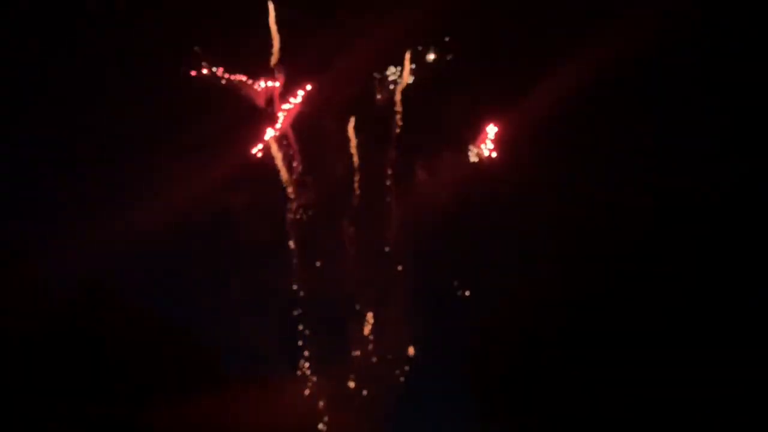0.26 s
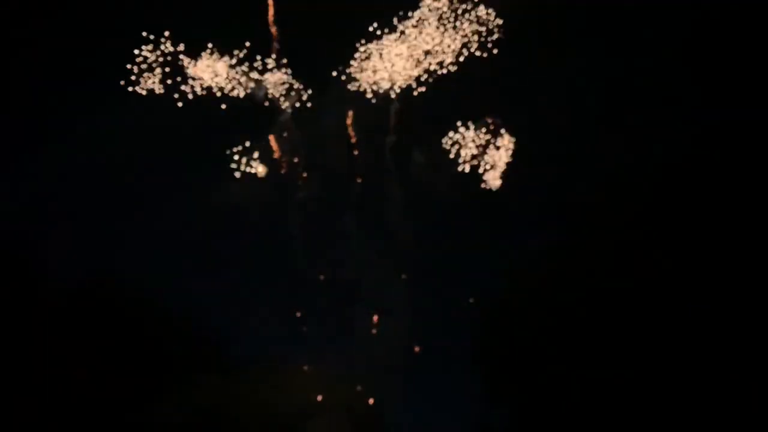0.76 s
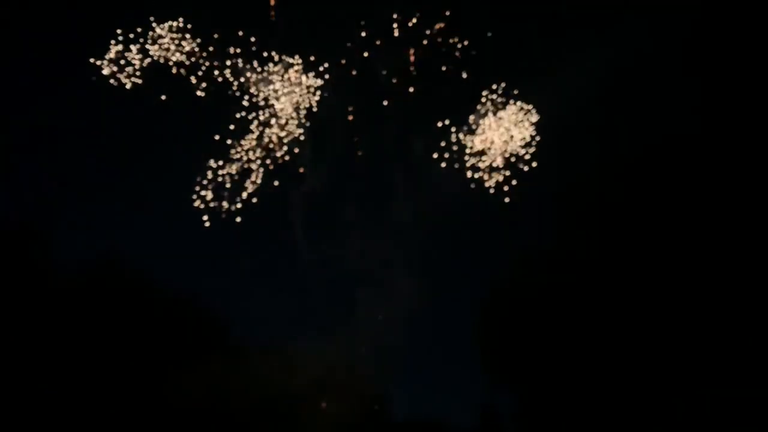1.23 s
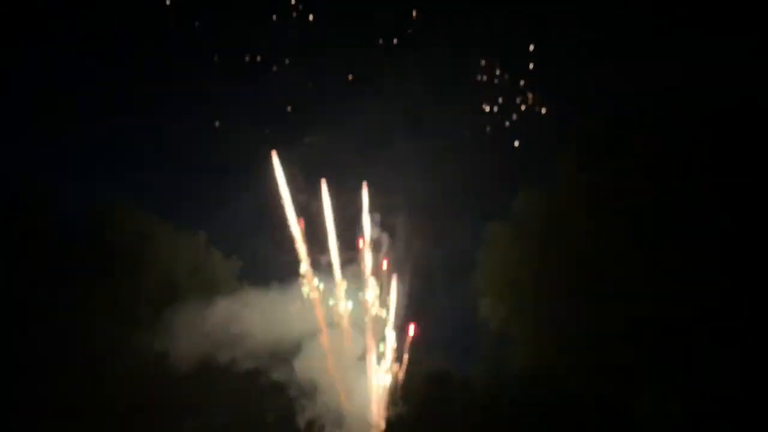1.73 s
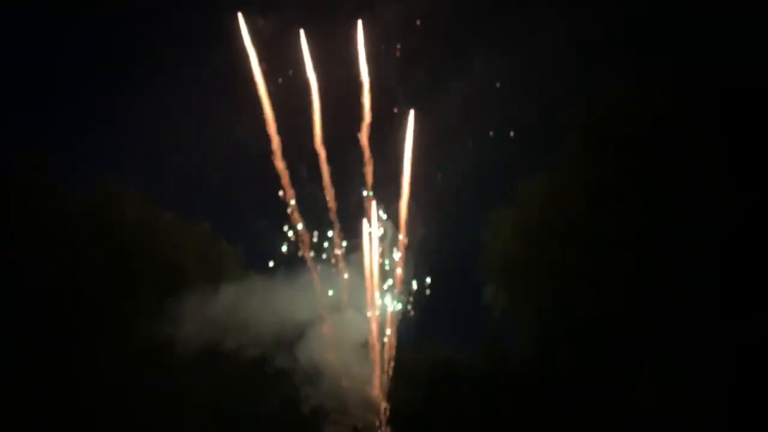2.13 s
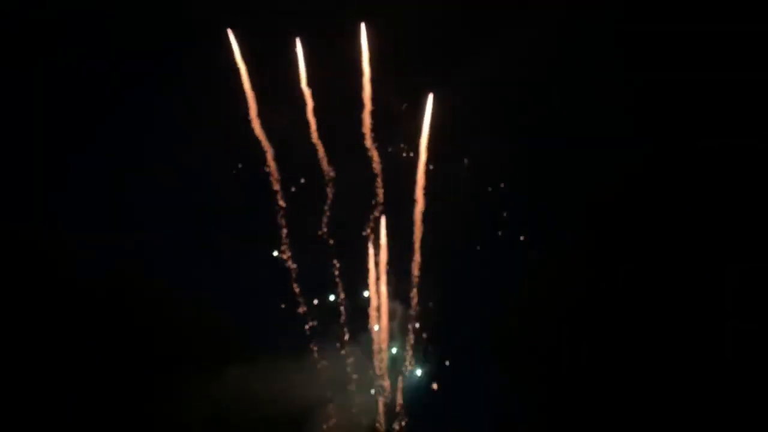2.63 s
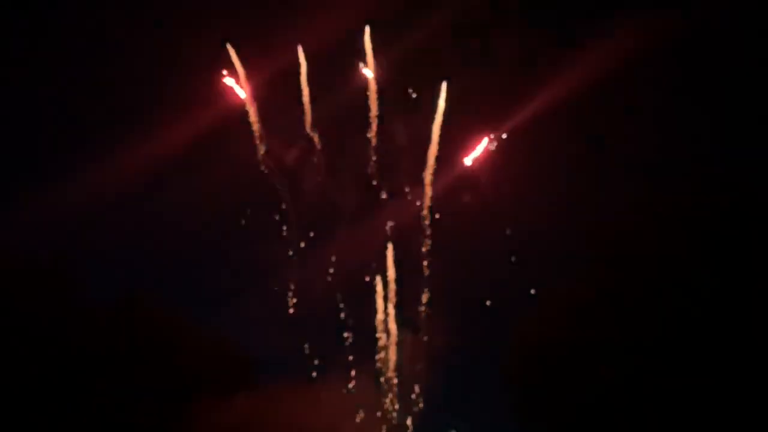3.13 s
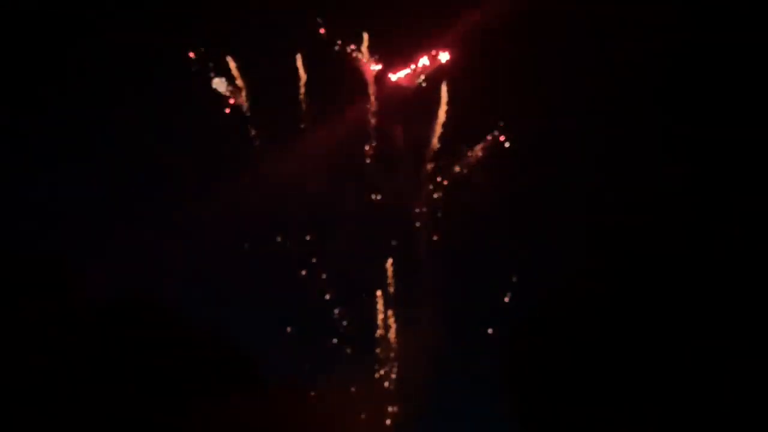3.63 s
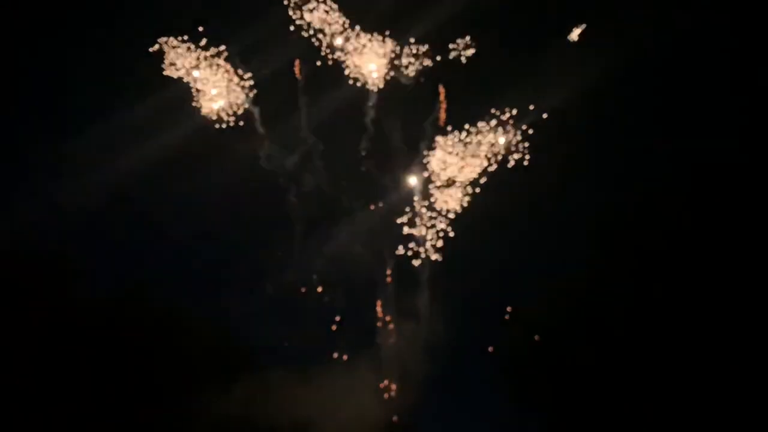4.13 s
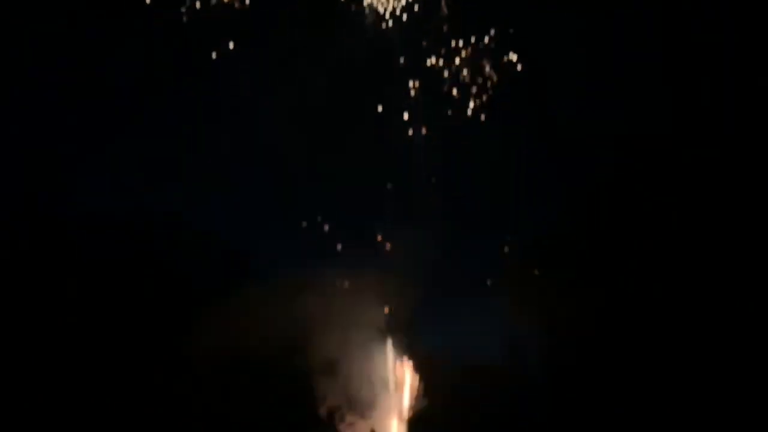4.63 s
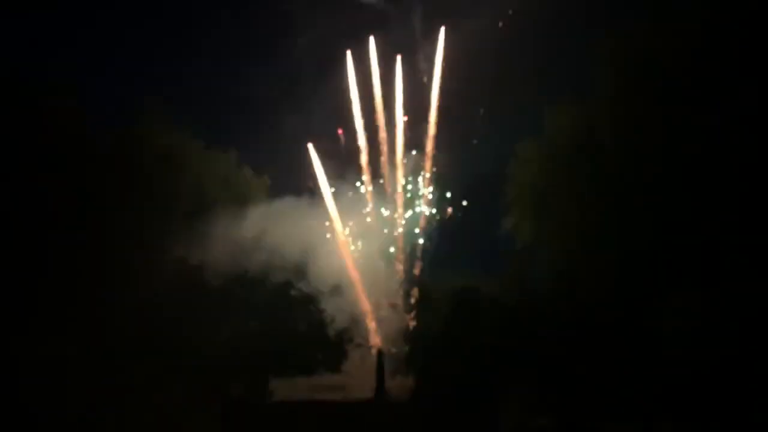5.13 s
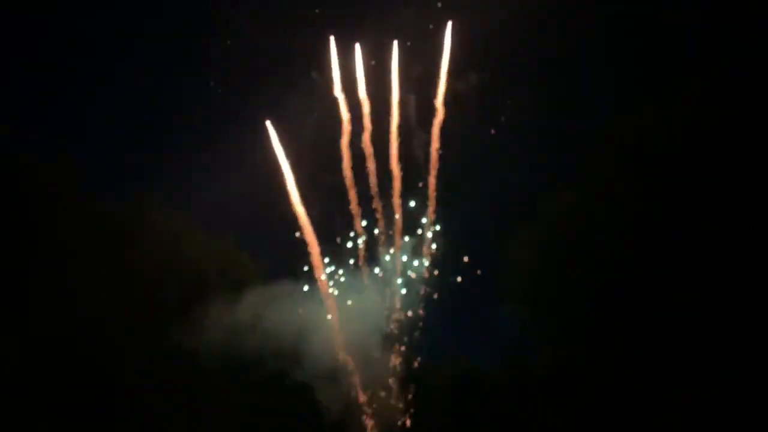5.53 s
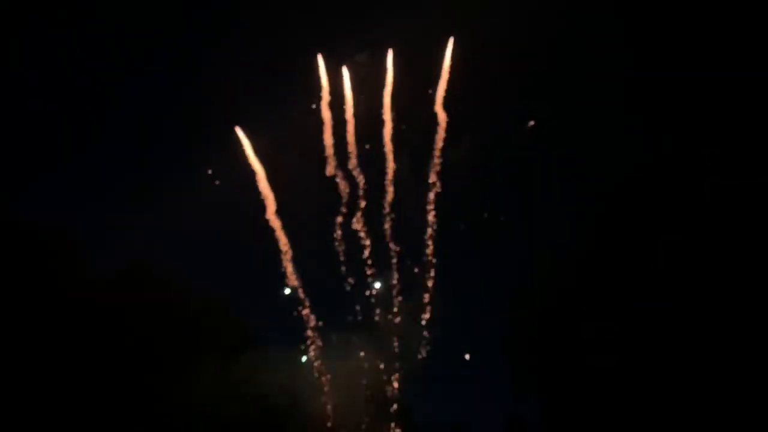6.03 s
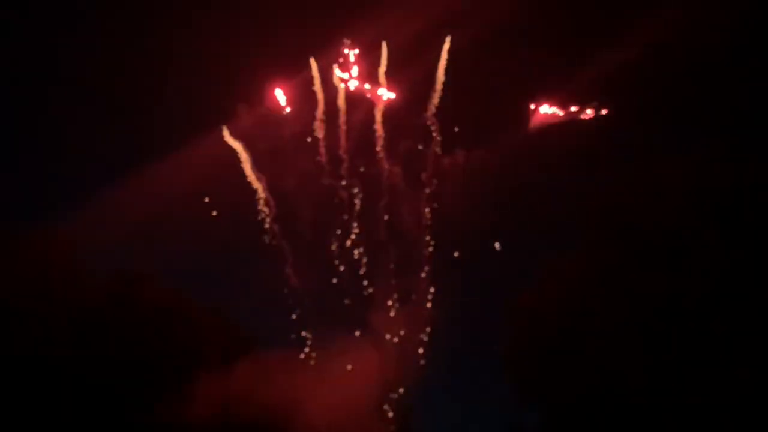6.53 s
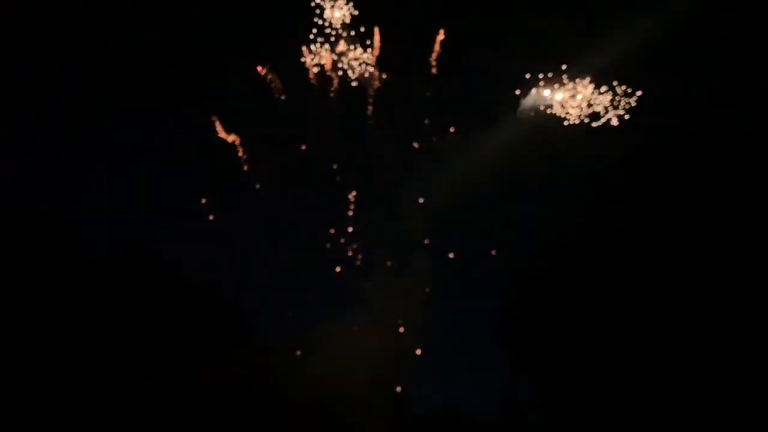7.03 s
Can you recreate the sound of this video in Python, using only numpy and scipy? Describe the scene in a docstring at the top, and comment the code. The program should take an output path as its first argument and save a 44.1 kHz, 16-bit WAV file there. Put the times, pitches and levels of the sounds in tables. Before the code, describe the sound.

Two fanned firework volleys in a tree-lined garden, heard in stereo from a moderate distance. Crackling stars thicken into a cloud, launch charges thump in fast succession, burning trails fizz, and piercing short whistles glide mostly downward. Hard single reports leave brief scattered echoes. The pattern repeats with another cloud of snaps and another burst of launches, ending in fresh crackle, while faraway fireworks thud, pop dully and rumble beneath.

```python
"""A tree-lined garden at night, where a fireworks cake fires two fanned volleys.
Lift charges thump and crack, and comets fizz: pulses with sprays of reflections, and shaped hiss.
Shells burst with sharp reports, and stars crackle singly and in clouds: short pulses with ground bounces.
Trees scatter the sound back as fading noise, and thin gliding tones whistle.
Far off, other fireworks boom, pop and rumble: deep pulses, short rings and low noise."""
import sys
import numpy as np
from scipy import signal
from scipy.fft import rfft, irfft, next_fast_len
from scipy.io import wavfile
from scipy.ndimage import uniform_filter1d, minimum_filter1d

SR = 44100
rng = np.random.default_rng(int(sys.argv[2]) if len(sys.argv) > 2 else 0)


def int16_out(signal):
    """Quantize to a 16-bit WAV file."""
    q = np.round(np.clip(np.atleast_2d(signal).T, -1, 1) * 32767)
    wavfile.write(sys.argv[1], SR, q.astype(np.int16))


N = 320254
TIME = np.arange(N) / SR

# All levels in the tables are relative: each sound sets its own balance on top of them.
# Lift charges that throw shells out of the tubes: start_s, thump_level_db, muzzle_crack_level_db
LIFT_CHARGES = [(1.5063, -9, -10.5), (1.5292, -14, -6), (1.555, -14.5, -13), (1.5788, -11.5, -8.5),
                (1.5981, -15, -6), (1.6246, -11, -9.5), (1.682, -38, -35), (1.702, -18, -14.5),
                (4.691, -14, -11.5), (4.727, -15, -12), (4.752, -23, -16), (4.7754, -19, -13.5),
                (4.804, -14, -14), (4.825, -18.5, -12.5), (4.851, -16, -16), (4.873, -16.5, -18)]
# Shell bursts: start_s, level_db, ground_echo_lag_ms, ground_echo_db, tree_echo_db, late_wash_db
SHELL_BURSTS = [(0.9046, -2, 4.1, -1.5, -7, -29), (1.643, -2, 3.29, -5.5, -9, -56),
                (2.4801, 2.5, 2.7, -21, -12, -31), (3.1006, -2, 2.52, -5, -4, -28),
                (3.5854, 0, 3.26, -3, -7, -32.5), (4.5134, -0.5, 3.86, -0.5, -24, -31),
                (5.4041, 1.5, 3.55, 0.5, -7, -34.5), (6.0286, 0.5, 2.8, -4, -6, -29.5),
                (6.8449, 0, 4.2, -1.5, -7.5, -32.5)]
# Clouds of crackling stars: start_s, build_up_s, hold_s, level_db
CRACKLE_CLOUDS = [(0.757, 0.066, 0.5, -26), (3.987, 0.1, 0.075, -38.5), (4.197, 0.028, 0.29, -25.5),
                  (7.052, 0.25, .1, -37)]
# Stars that whistle and fizz as they burn:
# start_s, length_s, first_pitch_hz, last_pitch_hz, whistle_level_db, roughness (0 to 1), fizz_level_db
WHISTLING_STARS = [(0.342, .22, 3020, 2830, -39.5, 0.2, -38), (0.465, 0.055, 2900, 2840, -39.5, 0.3, -53),
                   (0.55, 0.089, 2890, 2940, -39, .4, -42), (0.58, 0.11, 3090, 3080, -47, 0.5, -56),
                   (1.899, 0.21, 3050, 2837, -40.5, 0.53, -44), (2.04, 0.067, 3020, 3130, -40.5, 0.42, -82),
                   (2.1, 0.13, 3000, 2920, -46, 0.6, -79), (2.387, 0.1, 2980, 2920, -42, 0.76, -40),
                   (2.503, 0.26, 3090, 2880, -43.5, 0.9, -45.5), (3.035, .05, 3200, 4300, -61, 1, -60),
                   (3.226, .2, 2956, 2864, -38, 0.34, -41), (3.355, 0.087, 3300, 3150, -45, .2, -64),
                   (3.387, 0.17, 2970, 2870, -42, 0.86, -56), (3.963, 0.21, 2890, 2810, -37.5, 0.8, -38),
                   (4.832, 0.2, 3070, 2880, -40.5, .5, -43), (5.419, 0.17, 3050, 2930, -41.5, 0.37, -39),
                   (5.556, 0.158, 2940, 2850, -36.5, 0.37, -46.5), (5.63, 0.1, 3290, 3210, -52, 0.4, -69),
                   (5.68, .12, 2910, 2900, -46, .3, -75), (6.17, 0.31, 3080, 2705, -38, 0.3, -39),
                   (6.31, 0.19, 3060, 2923, -43, 0.45, -44.5), (6.42, 0.12, 2903, 2770, -47, .6, -64),
                   (6.898, 0.14, 2950, 2605, -41.5, 0.47, -41), (6.99, 0.11, 2854, 2840, -39, 0.34, -44.5)]
# Spectrum of a sharp crack: frequency_hz, level_db (per Hz)
SHARP_SPECTRUM = [(100, 13), (1000, 9), (3000, 7.5), (4200, 9.5), (7000, 6.5), (8500, -5), (11000, 1),
                  (16000, -18)]
# Spectrum of the distant rumble: frequency_hz, level_db (per Hz)
RUMBLE_SPECTRUM = [(20, -61), (45, -4.5), (75, 1.5), (130, -2.5), (200, -0.5), (290, -2), (420, -15.5),
                   (1000, -13.5), (4000, -101)]


def from_db(db):
    """Turn decibels into gain."""
    return 10 ** (np.asarray(db) / 20)


def rms_one(x):
    """Scale to an average (rms) level of one."""
    return x / np.sqrt(np.mean(x ** 2) + 1e-20)


def lowpass(x, hz, order=1):
    """Dull the treble above a frequency."""
    return signal.sosfilt(signal.butter(order, hz, fs=SR, output="sos"), x)


def highpass(x, hz, order):
    """Thin out the bass below a frequency."""
    return signal.sosfilt(signal.butter(order, hz, "high", fs=SR, output="sos"), x)


def smeared(x, hz, width_hz):
    """All-pass filter: delays one band a little, so that a spike becomes a short swing."""
    r = np.exp(-np.pi * width_hz / SR)
    poles = [1, -2 * r * np.cos(2 * np.pi * hz / SR), r * r]
    return signal.lfilter(poles[::-1], poles, x)


def on_bins(points, size):
    """Read a table at the bins of an FFT, in straight lines over log frequency."""
    hz, value = np.transpose(points)
    bin_hz = np.arange(size // 2 + 1) * SR / size
    return np.interp(np.log(bin_hz + 1), np.log(hz), value)


def drift(rate, size=N):
    """Random wander with unit spread, built from rate random points per second."""
    knots = rng.standard_normal(2048)
    return rms_one(np.interp(TIME[:size] * rate, np.arange(len(knots)), knots))


def pulse(spectrum, size=8192):
    """The most abrupt (minimum-phase) pressure pulse that has this spectrum; its peak is 1."""
    cepstrum = irfft(np.log(from_db(on_bins(spectrum, size))))
    # folding the second half onto the first puts all the energy after the start
    cepstrum[1:size // 2] *= 2
    cepstrum[size // 2 + 1:] = 0
    wave = irfft(np.exp(rfft(cepstrum)))
    return wave / np.abs(wave).max()


def through(x, response):
    """Give every impulse in x this response (convolution), keeping the length of x."""
    return signal.fftconvolve(np.atleast_2d(x), np.atleast_2d(response), axes=1)[:, :x.shape[-1]]


def diffuse(spectrum, size=N):
    """Stereo noise from all sides: alike in the bass, largely unrelated in the treble."""
    # Left-right likeness of diffuse sound: frequency_hz, likeness (-1 to 1)
    likeness = [(60, 0.91), (150, 0.94), (300, 0.77), (640, 0.23), (1400, 0.16), (3100, -0.078),
                (6800, 0.052), (15000, -0.26)]
    padded = next_fast_len(size // 2 + 1) * 2
    mid, side = rfft(rng.standard_normal((2, padded)))
    alike = np.clip(on_bins(likeness, padded), -1, 1)
    ears = np.sqrt(1 + alike) * mid + np.sqrt(1 - alike) * side * [[1], [-1]]
    coloured = ears * from_db(on_bins(spectrum, padded))
    return rms_one(irfft(coloured)[:, :size])


def clicks(times, gains, lead=0):
    """Stereo impulses; the left ear hears each one lead seconds sooner."""
    out = np.zeros((2, N))
    for ear, at in zip(out, (times - lead / 2, times + lead / 2)):
        inside = at * SR < N - 1
        np.add.at(ear, np.round(at[inside] * SR).astype(int), gains[inside])
    return out


def scatter(times, gains, t60, count=60, width=.0003):
    """Each hit becomes its own dying spray of reflections, as strong in total as the hit.

    t60 is the time in seconds for a 60 dB fall; the spray lasts half as long.
    """
    delay = t60 / 2 * rng.random((len(times), count))
    spray = rng.standard_normal(delay.shape) * from_db(-60 * delay / t60)
    spray *= gains[:, None] / np.sqrt(np.sum(spray ** 2, axis=1, keepdims=True))
    lead = width * rng.uniform(-1, 1, delay.size)
    return clicks((times[:, None] + delay).ravel(), spray.ravel(), lead)


def swells(s, db, attack, hold, fall_db_per_s):
    """Summed power over time of sounds that each rise, hold and die away."""
    coarse = TIME[::64]
    age = coarse[:, None] - s
    fall_db = fall_db_per_s * np.maximum(age - attack - hold, 0)
    gain = np.clip(age / attack, 0, 1) * from_db(db - fall_db)
    return np.interp(TIME, coarse, np.sum(gain ** 2, axis=1))


def launches(rise=0.0035, lead=0.00022):
    """Each lift charge pushes out a slow thump; the muzzle cracks and spits gas on its heels."""
    # Spectrum of the thump: frequency_hz, level_db (per Hz)
    thump_spectrum = [(20, -67), (45, -41), (58, 0), (80, 7.5), (115, -7), (160, -4), (215, -5), (310, 3),
                      (420, -29), (1000, -16.5), (4000, -78)]
    s, thump_db, crack_db = np.transpose(LIFT_CHARGES)
    thumps = through(clicks(s - rise, from_db(thump_db), lead), pulse(thump_spectrum))
    muzzle = clicks(s, from_db(crack_db - 2.5), lead)
    spit = scatter(s, from_db(crack_db + 7.5), t60=0.0071)
    gas = scatter(s, from_db(crack_db + 9), t60=0.07, count=400)
    return thumps + through(muzzle + spit + gas, pulse(SHARP_SPECTRUM))


def reports(low_cut_hz=120, body_lead=.00008, crack_lead=-0.00017, body_lag=0.00016):
    """A blast wave with a needle-sharp edge and dull rear, its ground bounce, then the trees' answer."""
    # Spectra of the blast and of its sharp edge: frequency_hz, level_db (per Hz)
    blast_spectrum = [(30, -52), (120, -2), (350, -3.5), (750, -2), (1200, 1.5), (2000, -1), (3000, -15),
                      (6000, -25.5), (16000, -38)]
    edge_spectrum = [(100, -50), (1500, -16), (3500, 7.5), (7000, 3.5), (11000, 1.5), (16000, -12)]
    body_db, early_db, late_db = 4, -8, -14
    crack_db, crack_bounce_db, ragged_db = 7.5, -13, -6
    suction_s, suction_db, suction_cut_hz = 0.001797, -8, 640
    s, db, ground_ms, ground_db, echo_db, _ = np.transpose(SHELL_BURSTS)
    ground_s = ground_ms / 1000

    direct = clicks(s + body_lag, from_db(db), body_lead)
    bounce = clicks(s + body_lag + ground_s, from_db(db + ground_db), body_lead)
    fronts = direct + lowpass(bounce, 7500)  # the grass dulls the bounce
    # the dull rear of a blast wave follows its front
    behind = np.roll(fronts, int(suction_s * SR), axis=1)
    rears = from_db(suction_db) * lowpass(behind, suction_cut_hz)
    early = scatter(s, from_db(db + early_db), t60=0.024, width=0.00019)
    late = scatter(s + 0.00311, from_db(db + late_db), t60=0.049)
    # the middle frequencies of a shock front trail its edge
    blast = from_db(body_db) * smeared(pulse(blast_spectrum), hz=1160, width_hz=4800)
    body = through(fronts + rears + early + late, blast)

    shreds = scatter(s, from_db(db + ragged_db), t60=0.013)
    needles = clicks(s, from_db(db + crack_db), crack_lead)
    needles += clicks(s + ground_s, from_db(db + crack_db + crack_bounce_db), crack_lead)
    crack = through(needles + shreds, pulse(edge_spectrum))

    towards_trees = clicks(s, from_db(db + echo_db))
    spread = through(towards_trees, pulse(blast_spectrum) + pulse(SHARP_SPECTRUM))
    answer = trees(spread, swell=0.00073, t60=0.44, treble_t60=0.63, split_hz=9400)
    return highpass(body + crack + from_db(5) * answer, low_cut_hz, order=2)


def cracks(times, gains):
    """Tiny detonations: a snap of its own brightness, a duller ground bounce and a faint fray."""
    # Spectrum of one snap: frequency_hz, level_db (per Hz)
    snap_spectrum = [(30, -42), (100, -35), (270, -0.5), (380, -10), (520, 2), (750, -5.5), (1100, 4.5),
                     (2500, -2), (4500, -2), (7200, -3), (8500, -12), (11000, -5.5), (13500, -20),
                     (16000, -14)]
    tone_db, tone_hz = 5, 2460  # stars differ in how much treble they have
    bounce_s, bounce_db, bounce_cut_hz = .0043, -3, 3800  # the grass returns snaps late and dull
    lead = rng.normal(.00013, .00011, len(times))
    lag = bounce_s * (1 + 0.15 * rng.standard_normal(len(times)))
    brightness = from_db(tone_db * rng.uniform(-1.7, 1, len(times)))
    treble = clicks(times, gains * brightness, lead)
    # below tone_hz the plain level comes back, so brightness changes only the treble
    snaps = treble + lowpass(clicks(times, gains, lead) - treble, tone_hz)
    bounce = lowpass(clicks(times + lag, gains * from_db(bounce_db), lead), bounce_cut_hz)
    fray = scatter(times, gains * from_db(-8), t60=.014, count=30)
    return through(snaps + bounce + fray, pulse(snap_spectrum))


def stars(spread=.003, neighbour_db=-4):
    """A loud star goes off with one snap; a weaker neighbour goes off within milliseconds of it."""
    # The loudest single stars: start_s, level_db
    loud_stars = [(0.0272, -7.5), (0.1424, -5), (0.1536, -5.5), (0.468, -13.5), (0.5355, -6), (0.5826, -8),
                  (0.6208, -2), (0.6517, -2.5), (0.6595, -3.5), (0.7257, 0.5), (0.732, -9), (0.763, 0),
                  (0.771, -2), (0.777, -6), (0.788, -9), (0.798, -8), (0.816, -3), (0.8326, -1),
                  (0.848, -1), (0.8572, 1), (0.871, -5), (0.8889, 5), (0.948, 0), (0.982, -10),
                  (0.986, -3.5), (0.9956, -1.5), (1.048, -5), (1.067, -6.5), (1.0715, -3), (1.1053, -5),
                  (1.1119, -4), (1.1374, -2), (1.1661, -8), (1.1764, 3), (1.183, -0.5), (1.197, -9),
                  (1.2118, -9), (1.2189, -3), (1.2374, 0.5), (1.2495, -4), (1.26, -12), (1.278, 1),
                  (1.3, -4), (1.335, -0.5), (1.357, -3.5), (1.3898, -11), (1.407, -2), (1.499, -5.5),
                  (1.546, 0.5), (3.0109, -22.5), (3.123, -27), (3.163, -8.5), (3.2463, -6.5),
                  (3.9028, -10.5), (3.9798, -11.5), (4.0026, -7), (4.0198, -4.5), (4.0244, -4),
                  (4.0275, -6), (4.0476, -6.5), (4.0483, -5), (4.0583, -0.5), (4.0642, -16), (4.0705, -10),
                  (4.0971, -5), (4.1062, -5.5), (4.1241, -6), (4.1375, -3), (4.1491, -1), (4.1598, -7.5),
                  (4.1692, -5), (4.1827, 2), (4.1905, -14), (4.2149, -0.5), (4.2212, -2.5), (4.2258, 2),
                  (4.2302, 3.5), (4.2476, -2), (4.251, 2.5), (4.263, 4.5), (4.2755, -4), (4.2776, -5),
                  (4.306, -1), (4.32, -2), (4.339, 2), (4.3688, 6), (4.3743, -7), (4.394, 4), (4.43, 2),
                  (4.439, -4), (4.4717, -21), (4.5779, -31), (4.608, -17), (4.6304, -6), (4.647, -9.5),
                  (4.658, -6.5), (4.8645, -1.5), (4.922, -14.5), (5.4272, -18), (7.0397, -9.5),
                  (7.087, -6.5), (7.0988, -3), (7.1096, -6), (7.123, -3), (7.1499, -1), (7.1578, -4),
                  (7.1954, -2), (7.204, -6), (7.2261, 1.5), (7.2505, -5)]
    s, db = np.transpose(loud_stars)
    neighbours = s + spread * rng.uniform(-1, 1.5, len(s))
    return cracks(s, from_db(db)) + cracks(neighbours, from_db(db + neighbour_db))


def clouds():
    """Many stars of very unequal strength crackle in clumps, each with a snap of its own."""
    born = np.flatnonzero(rng.random(N) < 240 / SR) / SR  # about 240 stars a second
    crackle = cracks(born, from_db(9 * rng.uniform(-1, 1, len(born))))
    # even out the running loudness, so that the clouds set the level
    crackle /= np.sqrt(uniform_filter1d(np.mean(crackle ** 2, axis=0), size=3000) + 1e-4)
    s, build_up, hold, db = np.transpose(CRACKLE_CLOUDS)
    power = swells(s, db, build_up, hold, fall_db_per_s=255)  # the last stars go out quickly
    clumps_db = 2 * drift(70)
    return from_db(1.5 + clumps_db) * np.sqrt(power) * crackle


def whistles(waver=0.0078, octave_db=-17, third_db=-29, rasp_db=-3, level_db=4):
    """Thin gliding tones swell, flutter and rasp, with patchy overtones, and linger among the trees."""
    # Spectrum of the rasp: frequency_hz, level_db (per Hz)
    rasp_spectrum = [(1500, -61), (2620, -19), (2830, 17), (2950, -2), (3080, 12), (3350, -65), (5000, -57)]
    peak_share, rasp_share = 0.47, .5  # where along its length a whistle peaks; rasp at full roughness
    bounce_s, bounce_db, trees_db = .0043, -14, -11
    out = np.zeros((2, N))
    rasp = from_db(rasp_db) * diffuse(rasp_spectrum)
    for s, length, first_hz, last_hz, db, rough, _ in WHISTLING_STARS:
        start = int(s * SR)
        size = min(int(length * SR), N - start)
        rough = np.clip(rough, 0, 1)
        span, along = slice(start, start + size), TIME[:size] / length
        glide_hz = first_hz + (last_hz - first_hz) * along
        hz = glide_hz * (1 + 2 * waver * np.sqrt(rough) * drift(295, size))
        # each ear starts at its own point of the wave
        phase = 2 * np.pi * (np.cumsum(hz) / SR + rng.random((2, 1)) / 4)
        tone = np.sqrt(1 - rasp_share * rough) * np.sin(phase)
        core = tone + np.sqrt(rasp_share * rough) * rasp[:, span]
        patches = from_db(4 * drift(45, size))
        flutter = from_db(2.5 * drift(60, size))
        harmonics = from_db(octave_db) * np.sin(2 * phase) + from_db(third_db) * np.sin(3 * phase)
        swell = np.interp(along, [0, peak_share, 1], [0, 1, 0]) ** .5
        out[:, span] += from_db(db + level_db) * swell * flutter * (core + patches * harmonics)
    # the ground bounce makes a whistle swell and dip as it glides
    out += from_db(bounce_db) * np.roll(out, int(bounce_s * SR), axis=1)
    return out + from_db(trees_db) * trees(out, swell=0.04, t60=0.88, treble_t60=0.15, split_hz=3900)


def fizz():
    """Grainy hiss of burning powder: comet tails, fresh and whistling stars, and crackling clouds."""
    # Spectrum of the hiss: frequency_hz, level_db (per Hz)
    hiss_spectrum = [(500, -2), (2500, 9.5), (4200, 4.5), (5500, 4), (7300, 14), (8400, -25), (9800, 15),
                     (12000, 3.5), (13300, -19), (15000, 2), (16500, -47)]
    lift_s, thump_db, _ = np.transpose(LIFT_CHARGES)
    burst_s, burst_db, *_ = np.transpose(SHELL_BURSTS)
    star_s, length, *_, star_db = np.transpose(WHISTLING_STARS)
    star_fall_db_per_s = 132
    comets = swells(lift_s, thump_db - 28, attack=0.0086, hold=0.04, fall_db_per_s=58)
    # stars catch fire after a burst
    lit = swells(burst_s, burst_db - 46.5, attack=0.023, hold=.12, fall_db_per_s=81)
    # a star flares, burns for a share of its whistle, and dies
    flares = swells(star_s, star_db, 0.089, 0.38 * length, star_fall_db_per_s)
    # an earlier burst is still dying away at the start
    opening = from_db(-45.5 - star_fall_db_per_s * TIME) ** 2
    still_air = from_db(-64.5) ** 2
    power = still_air + opening + comets + lit + flares + cloud_air(-13)
    grain_db = 2.0 * drift(190)
    return np.sqrt(power) * from_db(-1.5 + grain_db) * diffuse(hiss_spectrum)


def ticks():
    """Small bright ticks ring briefly, each a pulse with a few strong pitches."""
    # The ticks: start_s, level_db
    small_ticks = [(0.281, -11.5), (5.574, -20), (6.7102, -22)]
    # Spectrum of their ring: frequency_hz, level_db (per Hz)
    ring_spectrum = [(300, -45), (1200, -38), (1700, 1), (2150, 6.5), (2700, -23), (3400, 13), (3800, -1),
                     (4500, -15), (9000, -42)]
    s, db = np.transpose(small_ticks)
    return through(clicks(s, from_db(db)), pulse(ring_spectrum))


def trees(x, swell, t60, treble_t60, split_hz, size=65536, patchy_db=2):
    """Patchy echoes from the trees build up, then bass and treble die away at their own rates."""
    # Spectrum of the echoes: frequency_hz, level_db (per Hz)
    tree_spectrum = [(50, -6), (250, -6), (450, -4.5), (1000, -4), (2200, 5), (4000, 5), (8000, -3),
                     (16000, 7.5)]
    t = TIME[:size]
    noise = diffuse(tree_spectrum, size) * from_db(patchy_db * drift(85.0, size))
    low = lowpass(noise, split_hz, order=2) * from_db(-60 * t / t60)
    high = highpass(noise, split_hz, order=2) * from_db(-60 * t / treble_t60)
    # subtracting keeps the two bands in step where they meet
    echo = (low - high) * (1 - np.exp(-t / swell))
    return through(x.mean(axis=0), rms_one(echo) / np.sqrt(size))


def cloud_air(share_db):
    """Power of the blur that trails each cloud of crackle, share_db against its table level."""
    s, build_up, hold, db = np.transpose(CRACKLE_CLOUDS)
    return swells(s + 0.0039, db + share_db, build_up, hold, fall_db_per_s=70)


def wash():
    """Late, lumpy echoes from the surroundings swell after bursts, lift charges and clouds, then sink."""
    # Spectrum of the late echoes: frequency_hz, level_db (per Hz)
    wash_spectrum = [(100, -18), (350, -11.5), (550, -2.5), (1100, 3), (2000, 3), (2600, 0.5), (4000, -4.5),
                     (8000, -22), (16000, -90)]
    lift_db, opening_db, floor_db = -38.5, -32.5, -47.5
    attack_s, hold_s, fall_db_per_s = 0.15, 0.0082, 49
    burst_s, *_, burst_db = np.transpose(SHELL_BURSTS)
    lift_s = np.transpose(LIFT_CHARGES)[0]
    echoes = swells(burst_s, burst_db, attack_s, hold_s, fall_db_per_s)
    echoes += swells(lift_s, lift_db, attack_s, hold_s, fall_db_per_s)
    # an earlier burst is still dying away at the start
    opening = from_db(opening_db - fall_db_per_s * TIME) ** 2
    power = from_db(floor_db) ** 2 + opening + echoes + cloud_air(-9.5)
    lumps_db = 2 * drift(60)
    return np.sqrt(power) * from_db(-2.0 + lumps_db) * diffuse(wash_spectrum)


def pops():
    """Shells in the middle distance: a few hollow swings each; higher ones keep a bright edge."""
    # Dull pops: start_s, level_db, pitch_hz
    dull_pops = [(0.142, -17.5, 494), (0.151, -16, 300), (2.803, -14, 303), (5.948, -17.5, 322),
                 (6.312, -31, 266), (6.337, -20.5, 500), (6.469, -30, 240), (6.499, -14.5, 507),
                 (6.581, -26.5, 486), (6.626, -17, 308)]
    # Spectrum of the bright edge: frequency_hz, level_db (per Hz)
    pop_spectrum = [(100, -40), (500, -9), (1500, 3.5), (4500, -5), (7000, -8), (11000, -13), (16000, -25)]
    t60, edge_db = 0.021, 5.5
    t, out = TIME[:4096], np.zeros((2, N))
    for s, db, hz in dull_pops:
        ring = np.sin(2 * np.pi * hz * t) * from_db(-60 * t / t60) * (1 - np.exp(-t * hz))
        start = int(s * SR)
        out[:, start:start + len(t)] += from_db(db) * ring
    s, db, hz = np.transpose(dull_pops)
    edge = scatter(s, from_db(db + edge_db) * (hz / hz.max()) ** 8, t60=.012)
    return out + through(edge, pulse(pop_spectrum))


def booms():
    """Only the bass of far shells carries this far: one thud, a deep swell and a faint roll."""
    # Far booms: start_s, thud_level_db, deep_swell_level_db
    far_booms = [(0.126, -44, -39), (0.172, -31, -37), (0.269, -51, -33), (0.588, -31, -28),
                 (0.857, -26, -50), (2.402, -29, -45), (2.709, -18.5, -17), (2.801, -25, -43),
                 (3.418, -21.5, -41.5), (3.836, -17.5, -18.5), (5.968, -30, -54), (6.315, -27.5, -47),
                 (6.347, -34, -46), (6.423, -31, -38), (6.466, -26, -33)]
    # Spectrum of the thud: frequency_hz, level_db (per Hz)
    thud_spectrum = [(20, -34), (60, -9), (110, 0), (170, -6), (280, -10), (450, -26), (2000, -62),
                     (8000, -100)]
    deep_hz, deep_t60, deep_lag_s = 82.5, 0.12, 0.0034  # the deepest bass comes late and rings on
    s, db, deep_db = np.transpose(far_booms)
    roll = scatter(s + .02, from_db(db - 10), t60=.25)
    thuds = through(clicks(s, from_db(db)) + roll, pulse(thud_spectrum))
    t = TIME[:SR // 2]
    deep = np.sin(2 * np.pi * deep_hz * t) * from_db(-60 * t / deep_t60)
    return thuds + through(clicks(s + deep_lag_s, from_db(deep_db)), deep)


def far_thuds(thuds_per_s=22, level_db=-37, spread_db=4):
    """Many other fireworks, so far off that only soft, uneven thuds arrive."""
    born = np.flatnonzero(rng.random(N) < thuds_per_s / SR) / SR
    gains = from_db(level_db + spread_db * rng.uniform(-0.94, 1, len(born)))
    return through(scatter(born, gains, t60=0.0598, count=8), pulse(RUMBLE_SPECTRUM))


def rumble():
    """Distant fireworks rumble throughout as low noise; lift thumps and crackle clouds add rolls."""
    floor_db, opening_db, roll_db, fall_db_per_s = -44, -39, -16.5, 76
    s, thump_db, _ = np.transpose(LIFT_CHARGES)
    rolls = swells(s, thump_db + roll_db, 0.021, 0, fall_db_per_s)
    # the roll of an earlier burst is still dying away at the start
    opening = from_db(opening_db - fall_db_per_s * TIME) ** 2
    power = from_db(floor_db) ** 2 + opening + rolls + cloud_air(-14)
    return np.sqrt(power) * from_db(3.45 * drift(22)) * diffuse(RUMBLE_SPECTRUM)


def scene():
    """Everything in the open air; the right side is a little louder."""
    near = launches() + stars() + clouds()
    echo = from_db(-5.0) * trees(near, swell=0.00063, t60=0.84, treble_t60=0.13, split_hz=7300)
    cake = near + echo + reports() + whistles() + fizz() + ticks()
    background = wash() + pops() + booms() + far_thuds() + rumble()
    return (cake + background) * from_db([[-.6], [.6]])


def record(dry):
    """A fast limiter ducks the loudest peaks, then the deepest bass and the top are cut."""
    allowed = np.minimum(1, .8 / (np.abs(dry).max(axis=0) + 1e-9))
    gain = uniform_filter1d(minimum_filter1d(allowed, size=15), size=15)
    heard = highpass(dry * gain, 34, order=3)
    cutoff_hz = 17000
    return signal.sosfilt(signal.cheby2(16, 80, cutoff_hz, fs=SR, output="sos"), heard)


dry = scene()
out = record(dry)
int16_out(out)
```